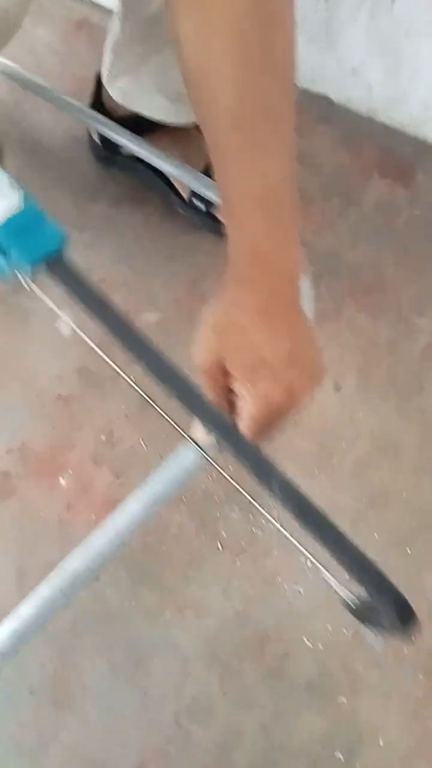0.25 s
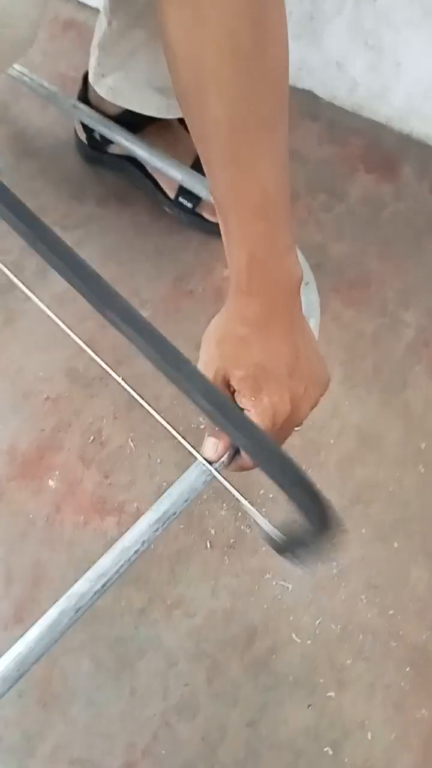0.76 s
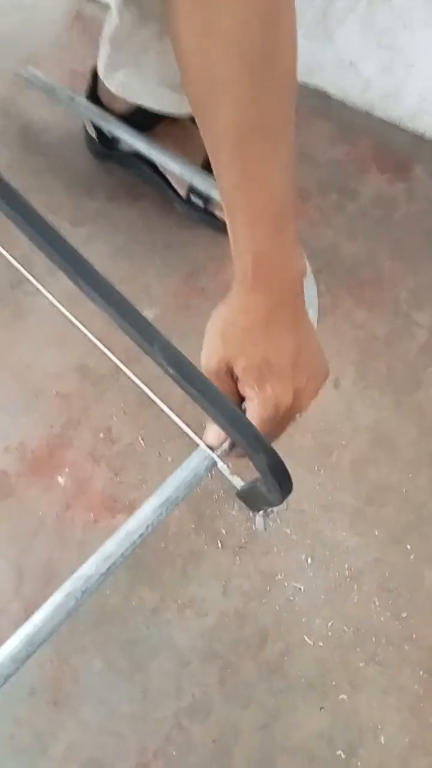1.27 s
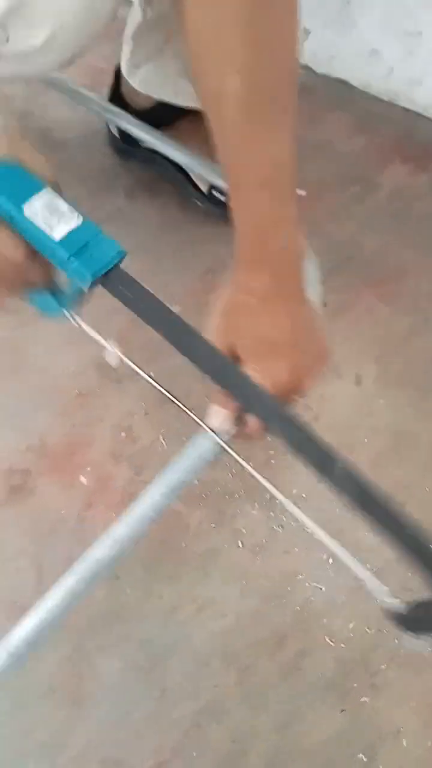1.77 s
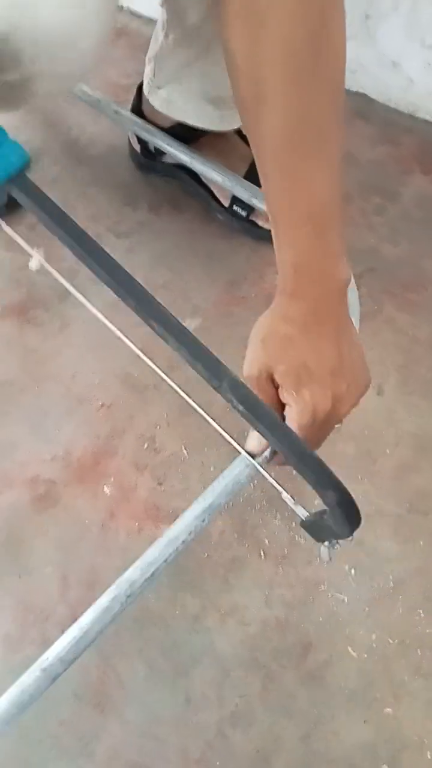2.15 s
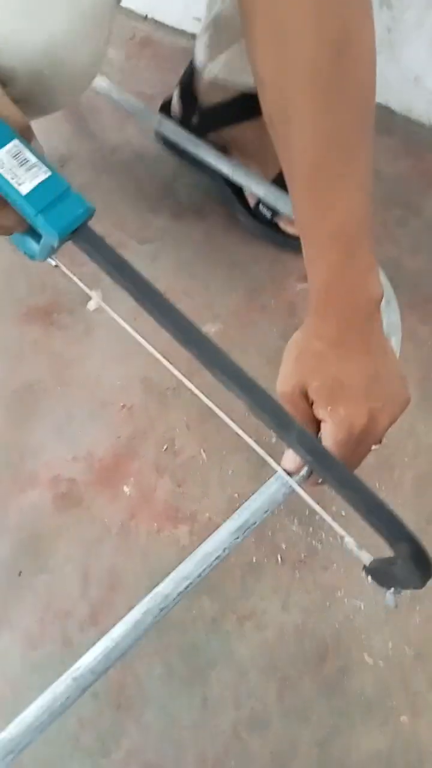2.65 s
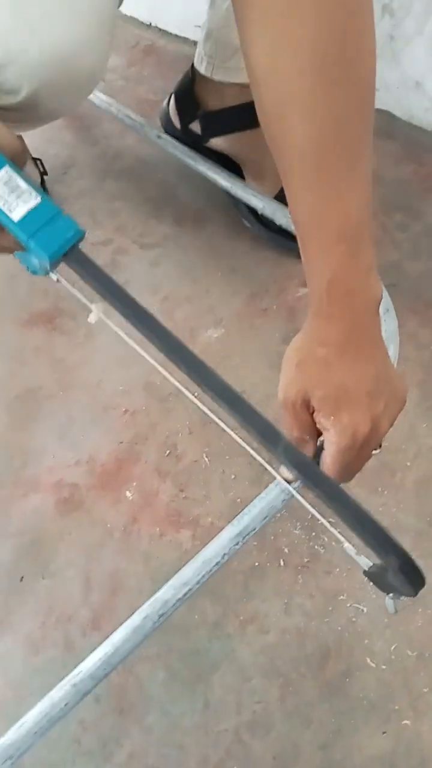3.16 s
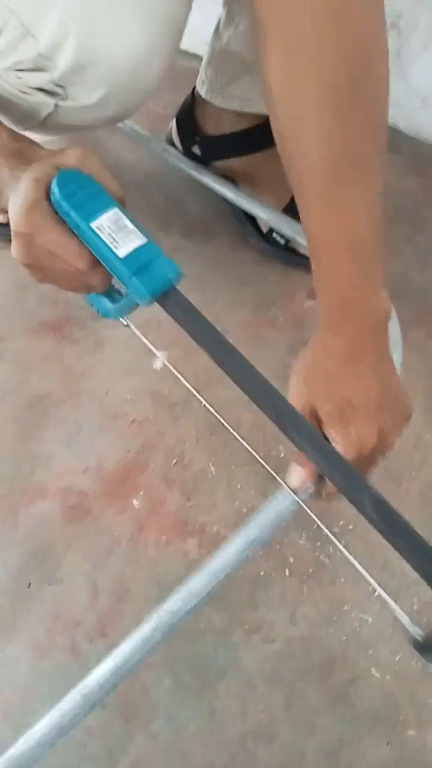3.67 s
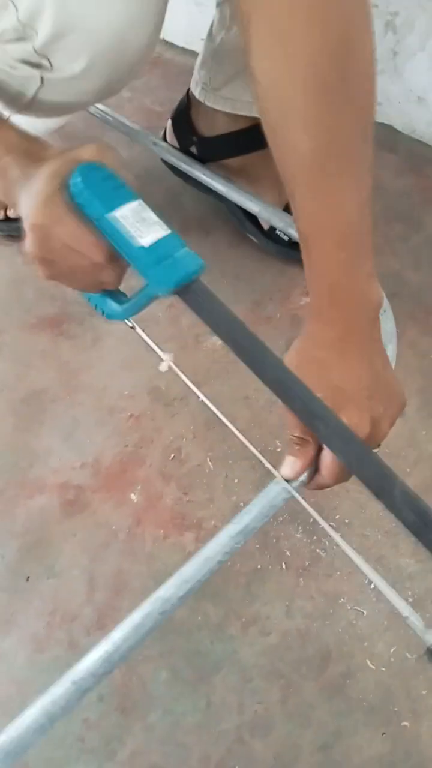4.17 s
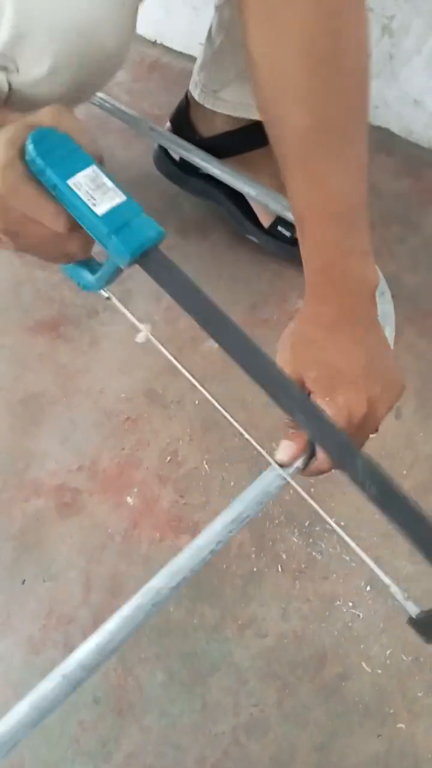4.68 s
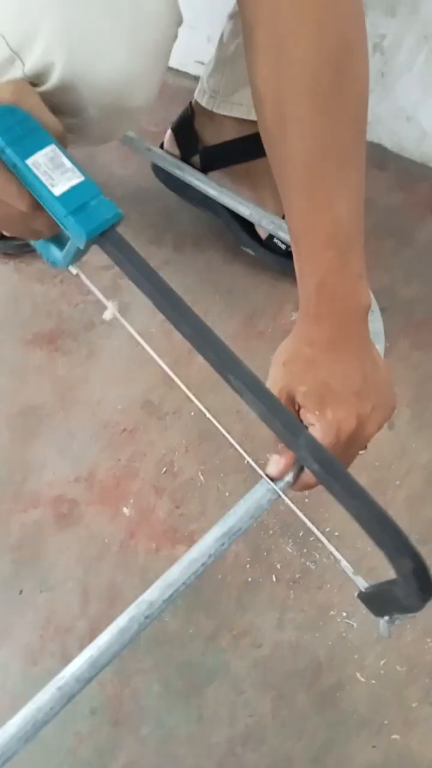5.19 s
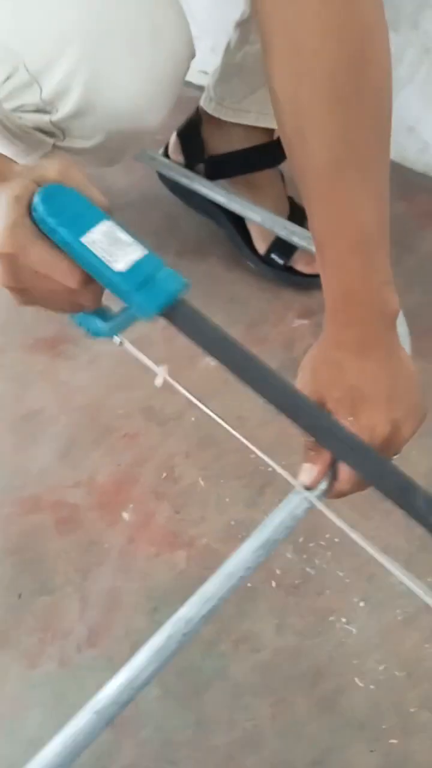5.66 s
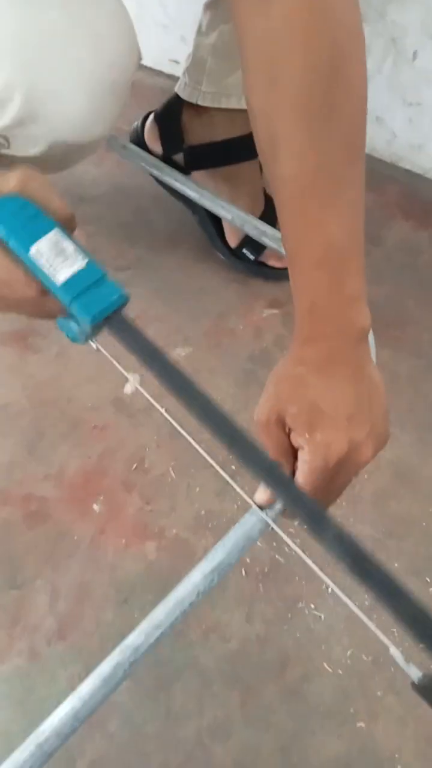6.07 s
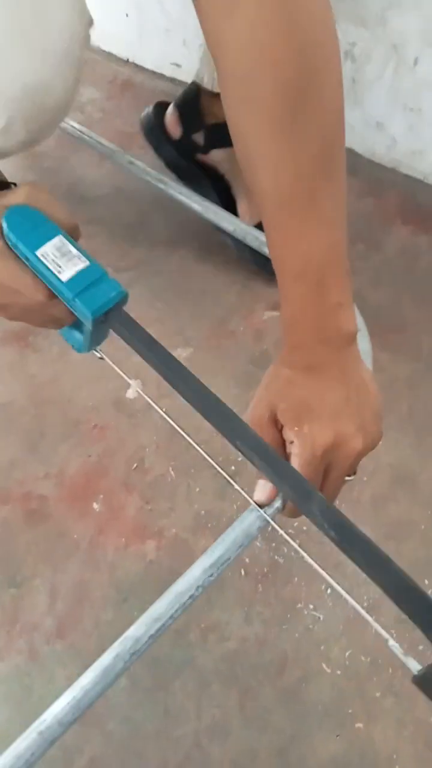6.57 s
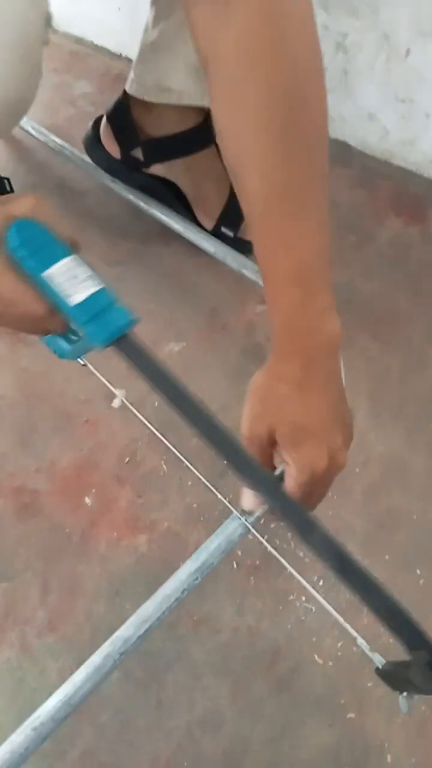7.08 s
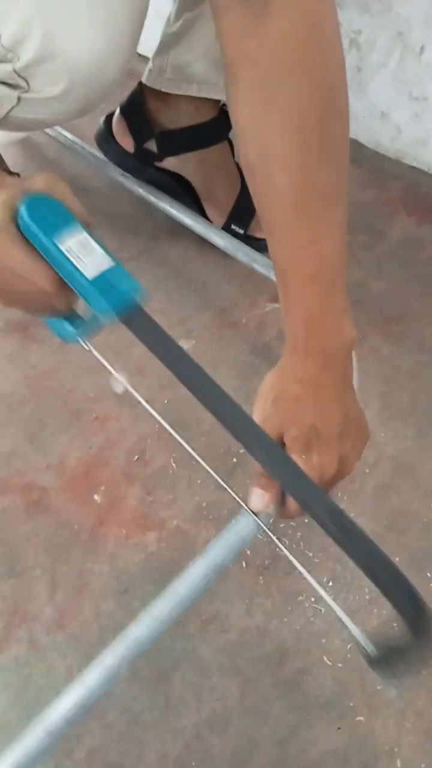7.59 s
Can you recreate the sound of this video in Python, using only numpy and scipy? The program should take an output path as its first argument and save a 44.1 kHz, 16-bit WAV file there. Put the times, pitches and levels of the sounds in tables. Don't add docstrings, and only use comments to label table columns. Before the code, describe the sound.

In a bare, echoing room, a hacksaw cuts a thin steel pipe close to a small, bright phone microphone. After a light scrape and hard clank, uneven rasping strokes come with sharp knocks and faint groans. A loud rattling clank interrupts at three seconds; sawing returns, pauses, then two more clanks precede the last strokes. Distant traffic rumbles throughout.

```python
import sys
import numpy as np
from scipy import signal
from scipy.fft import rfft, irfft
from scipy.io import wavfile
from scipy.ndimage import uniform_filter1d

SR = 44100
rng = np.random.default_rng(int(sys.argv[2]) if len(sys.argv) > 2 else 0)


def materialize(psi):
    bounded = np.clip(np.atleast_2d(psi).T, -1, 1)
    quanta = np.round(bounded * 32767).astype(np.int16)
    wavfile.write(sys.argv[1], SR, quanta)


def field_ratio(decibels):
    return 10 ** (np.asarray(decibels, dtype=float) / 20)


N = 345744

# (frequency [Hz], density [dB per Hz])
TRAFFIC_SPECTRUM = [(21, -63), (33, -36), (42, -9.5), (70, -17), (113, -4.5), (189, 4), (296, -4.5),
                    (362, -0.5), (485, -11.5), (559, -26), (600, -34), (780, -48), (1320, -120)]
# (frequency [Hz], width [Hz], level [dB])
ENGINE_BANDS = [(67.8, 28, 7.5), (172, 23, 3.5), (187, 24, -13)]
# (time [s], level [dB])
TRAFFIC_LEVEL = [(0.0, -50.5), (1.4, -47), (2.0, -50), (4.3, -49), (4.6, -48), (6.3, -47.5), (7.2, -42.5),
                 (7.84, -43)]
# (frequency [Hz], density [dB per Hz])
AIR_SPECTRUM = [(350, -36), (600, -8), (954, 11), (1360, 1), (1580, 10), (2130, 4), (4240, 9.5),
                (7360, -32), (12000, -15), (15600, -67), (22000, -120)]

# (start [s], rise [s], hold [s], cutting level [dB], tooth hiss re cut [dB])
PUSHES = [(0.128, 0.023, 0.042, -11, -17), (0.6, 0.05, 0.035, -8, -21), (0.978, 0.024, .05, -8, -16.5),
          (1.43, 0.028, 0.046, -10, -16), (2.02, 0.032, 0.082, -16.5, -12.5),
          (2.34, 0.027, 0.049, -9.5, -18.5), (3.66, 0.084, 0.028, -10, -19),
          (4.15, 0.042, 0.038, -9, -19.5), (4.655, 0.037, .035, -9.5, -17), (5.6, 0.085, 0.036, -9, -20.5),
          (7.335, 0.027, 0.071, -23.5, -15.5), (7.6, 0.08, 0.016, -11.5, -17.5)]
# (start [s], rise [s], hold [s], cutting level [dB], tooth hiss re cut [dB])
PULLS = [(0.0, 0.0012, 0.073, -33, -21), (0.33, 0.11, 0.0067, -17.5, -17.5),
         (0.74, 0.054, 0.036, -14, -14.5), (1.12, 0.11, 0.041, -14, -20),
         (1.58, 0.049, 0.084, -22.5, -24.5), (1.85, 0.034, 0.023, -30.5, -18),
         (2.2, 0.036, 0.023, -19.5, -20), (2.48, 0.08, 0.05, -21, -15.5), (2.66, 0.023, 0.0073, -43, -24),
         (3.45, 0.043, 0.053, -35.5, -20), (3.84, 0.072, 0.035, -19.5, -17),
         (4.31, 0.094, 0.026, -15.5, -15), (4.9, 0.05, 0.034, -26, -17), (5.28, 0.016, 0.17, -44.5, -15),
         (5.485, 0.023, 0.015, -39, -15), (5.52, 0.068, 0.017, -42.5, -11), (5.76, 0.019, 0.083, -25, -23),
         (7.76, 0.069, 0.021, -18, -17.5)]
# (rise depth [dB], ease time [s], ease depth [dB], drag time [s], drag fade [dB])
PUSH_SHAPE = (32, 0.013, 15.5, .16, 10)
PULL_SHAPE = (17.3, 0.022, 19, 0.21, 11)
THRUM_LIFT = (1, -11.5, -1.5, -14.5, -11)
HISS_LIFT = (-4, 1, -4, -8, -11)
# (frequency [Hz], density [dB per Hz])
SCRAPE_SPECTRUM = [(410, -25), (700, -14.5), (824, 2), (903, -4.5), (1030, -1.5), (1230, -8.5), (1390, 2.5),
                   (1940, -9.5), (3010, 1.5), (4300, 1.5), (6590, -25.5), (8000, -26.5), (10400, -43.5),
                   (17600, -120)]
# (frequency [Hz], density [dB per Hz])
HISS_SPECTRUM = [(3820, -62), (6500, -17), (7310, -35), (8460, 2), (9260, 2.5), (11700, 9.5), (14000, -1.5),
                 (16000, -5)]
# (frequency [Hz], level [dB], decay t60 [s])
PIPE_MODES = [(824, -20, 0.05), (1170, -30.5, 0.45), (1254, -7.5, 0.22), (1656, -11.5, 0.35),
              (1827, -2.5, 0.36), (2040, 3, 0.115), (2190, -13.5, 0.15), (2290, -4.5, 0.43),
              (2560, -1, 0.2), (2750, -13, 0.14), (2928, 1.3, 0.29), (3325, -22, 0.39), (3220, -9, 0.12),
              (3500, -8, 0.58), (3660, -10.5, 0.87), (3806, -6, 0.41), (4063, 2.5, 0.25), (4330, -6, 0.38),
              (5000, -71, 0.028), (4800, -18, 0.067), (5500, -15, 0.029)]
# (frequency [Hz], level [dB], decay t60 [s])
RIM_MODES = [(7650, -1, .3), (7730, 0, .35), (7827, -5, .3), (7962, -6, .25)]
# (frequency [Hz], width [Hz], level [dB])
FRAME_MODES = [(378, 118, -9), (459, 51, -5.5), (675, 43, -5), (824, 43, -4), (937, 92, 2),
               (1140, 35, -12.5)]

# (time [s], peak level [dB], rattle re peak [dB], rim ring re peak [dB], rattle t60 [s])
CLANKS = [
    (0.2196, -0.5, -13.5, -19, 0.37),
    (2.974, 3.5, -14, -13, 0.6),
    (6.3597, 0.5, -14.5, -33, 0.42),
    (6.8646, -0.5, -8.5, -67, 0.27),
]
# (frequency [Hz], width [Hz], level [dB])
CLANK_MODES = [
    [(2850, 40, 7), (2030, 130, -5), (3880, 51, -23), (4800, 32, -18)],
    [(1100, 39, -15), (1720, 13.6, -8.5), (2090, 32, -1), (2770, 160, 6.5), (3077, 16, -4.5), (3356, 31, 3),
     (3760, 29, -18), (3836, 50, 3.5), (4530, 22, -2.5), (4780, 110, -29), (5290, 12, -13)],
    [(1340, 90, -15), (1700, 52, -18), (1900, 15, -10.5), (2170, 29, -4.5), (2560, 52, 1.5),
     (2940, 56, 3.5), (3320, 24, -6), (3500, 22, -28), (3700, 28, -5), (4080, 39, -0.5), (4630, 30, -42)],
    [(372, 42, -15), (1710, 28, -12.5), (2070, 28, -12), (2640, 52, -1), (2910, 27, -5.5), (3790, 22, 1),
     (4200, 13, -15), (4200, 7.7, -8), (4660, 17, -45), (4870, 21, -46)],
]
# (time [s], peak level [dB], low part re peak [dB], top re peak [dB], strongest ring [Hz])
KNOCKS = [(0.4308, -7, -30, -27, 4300), (0.4955, -7.5, -41, -27, 1500), (0.7898, -6, -34, -35, 2970),
          (1.3663, -20.5, 9, -25, 1425), (1.8551, -15, -29, -27, 1720), (1.8738, -9, -39, -41, 1720),
          (2.2049, -9, -31, -38, 1720), (2.2176, -2, -41, -26, 2640), (2.4566, -3.5, -26, -24, 1810),
          (2.6867, -14, -36, -41, 1720), (3.4597, -31, -38, -18, 4370), (3.49, -36, -2, -27.5, 3960),
          (3.693, -23, -3, -15, 4200), (4.0149, 0, -13, -19, 4330), (4.3889, -16, -9, -21, 4370),
          (4.5056, -9.5, -4.5, -20, 4060), (5.254, -11.5, -28, -24.5, 1780), (5.499, -21.5, -5, -32, 2820),
          (5.666, -13.5, -20, -4.5, 4200), (5.8276, -5, -16, -32, 2500), (6.835, -30, -15, -32, 3040),
          (7.682, 4, -12, -26, 3473)]
# (middle [s], half length [s], frequency [Hz], level [dB])
GROANS = [(0.71, 0.085, 269, -31.5), (0.85, .08, 252.2, -34), (1.04, 0.035, 303, -42),
          (1.22, 0.091, 268.8, -32.5), (1.38, 0.21, 246, -25), (1.7, 0.25, 264, -38),
          (2.22, 0.052, 213, -35), (2.68, 0.14, 215, -47), (3.52, 0.051, 850, -37.5),
          (3.84, 0.15, 403.2, -34), (4.82, 0.19, 402.6, -37.5), (5.12, 0.094, 428.4, -44),
          (5.8, 0.11, 420, -37), (7.7, 0.047, 385, -33.5)]
# (frequency [Hz], decay t60 [s])
ROOM_T60 = [(200, 0.73), (530, 0.56), (1390, 0.59), (3680, 0.48), (9700, 0.41)]


def rms_one(x):
    return x / np.sqrt(np.mean(x ** 2) + 1e-20)


def low_pass(x, order, hz):
    return signal.sosfilt(signal.butter(order, hz, fs=SR, output="sos"), x)


def high_pass(x, order, hz):
    return signal.sosfilt(signal.butter(order, hz, "high", fs=SR, output="sos"), x)


def at_hz(points, hz):
    table_hz, values = np.array(points).T
    return np.interp(np.log(hz), np.log(table_hz), values)


def colour(x, spectrum):
    size = 2048
    hz = np.arange(1, size // 2 + 2) * SR / size
    cepstrum = irfft(np.log(field_ratio(at_hz(spectrum, hz))), size)
    cepstrum[1:size // 2] *= 2
    cepstrum[size // 2 + 1:] = 0
    response = irfft(np.exp(rfft(cepstrum)), size)
    response = response / np.sqrt(np.sum(response ** 2))
    return signal.oaconvolve(x, response)[:len(x)]


def drift(rate_hz):
    hop = 441
    knots = rng.standard_normal(N // hop + 300)
    r = np.exp(-2 * np.pi * rate_hz / 100)
    slow = rms_one(signal.lfilter([1], [1, -r], knots)[200:])
    return np.interp(np.arange(N) / hop, np.arange(len(slow)), slow)


def ring(force, hz, t60):
    r = field_ratio(-60 / (t60 * SR))
    w = 2 * np.pi * hz / SR
    return signal.lfilter([0.5, 0, -0.5], [1, -2 * r * np.cos(w), r * r], force + 1e-18)


def background():
    white = rng.standard_normal(N)
    engines = rms_one(sum(field_ratio(db) * rms_one(ring(white, hz, 2.55 / width)) for hz, width, db in ENGINE_BANDS))
    traffic = rms_one(colour(white, TRAFFIC_SPECTRUM)) + field_ratio(-2) * engines
    time_s, level_db = np.transpose(TRAFFIC_LEVEL)
    traffic *= field_ratio(np.interp(np.arange(N) / SR, time_s, level_db) + 0.72 * drift(19))
    return high_pass(traffic, 8, 35) + field_ratio(-51.5) * colour(rng.standard_normal(N), AIR_SPECTRUM)


def contact():
    power = np.zeros((3, N))
    for strokes, shape in ((PUSHES, PUSH_SHAPE), (PULLS, PULL_SHAPE)):
        rise_db, ease_s, ease_db, drag_s, fade_db = shape
        shape_db = -np.array([rise_db, 0, 0, ease_db, ease_db + fade_db])
        for start_s, rise_s, hold_s, db, hiss_db in strokes:
            corners = np.cumsum(np.abs([start_s, rise_s, hold_s, ease_s, drag_s])) * SR
            span = np.arange(int(corners[0]), min(int(corners[-1]), N))
            lifts_db = (0, np.array(THRUM_LIFT), hiss_db + np.array(HISS_LIFT))
            for layer, lift_db in enumerate(lifts_db):
                power[layer, span] += field_ratio(np.interp(span, corners, db + shape_db + lift_db)) ** 2
    return uniform_filter1d(np.sqrt(power), size=200)


def teeth(per_s, spread_db, judder_db):
    force = field_ratio(spread_db * np.minimum(rng.exponential(1, N), 4)) * rng.choice([-1, 1], N)
    catches = force * (rng.random(N) < per_s / SR)
    judder = np.repeat(rng.standard_normal(N // 100 + 1), 100)[:N]
    return rms_one(catches * field_ratio(judder_db * uniform_filter1d(judder, size=180)))


def patchy(x, patch_db):
    low = low_pass(x, 2, 1200)
    most = low_pass(x, 2, 2700)
    return sum(part * field_ratio(patch_db * drift(26)) for part in (low, most - low, x - most))


def muffle(x):
    return low_pass(x, 5, 5100)


def sawing():
    bite = teeth(per_s=4000, spread_db=1.8, judder_db=3.5)
    cut, load, fizz = contact()
    force = bite * cut
    thrum = bite * load
    scrape = field_ratio(-2) * patchy(colour(force, SCRAPE_SPECTRUM), patch_db=1.5)
    pipe = sum(ring(force * field_ratio(db + 11.3 * np.tanh(drift(25))), hz, 0.067 * t60) for hz, db, t60 in PIPE_MODES)
    frame = sum(ring(thrum * field_ratio(db + 8.2 * np.tanh(drift(12))), hz, 0.81 / width)
                for hz, width, db in FRAME_MODES)
    rim = sum(ring(force * field_ratio(db + 3 * drift(2.5)), hz, 0.3 * t60) for hz, db, t60 in RIM_MODES)
    hiss = colour(teeth(per_s=4700, spread_db=-1.5, judder_db=-2) * fizz, HISS_SPECTRUM)
    return scrape + muffle(field_ratio(-31) * pipe + field_ratio(-26.5) * frame) + field_ratio(-60) * rim + field_ratio(2.5) * hiss


def dying_noise(t60, size):
    return rng.standard_normal(size) * field_ratio(-60 * np.arange(size) / SR / t60)


def snap(t60, size):
    spray = 0.45 * dying_noise(t60, size)
    tick = 5.0 * (np.arange(size) == 8)
    return spray + tick


def clanks():
    size = 20000
    out = np.zeros(N + size)
    for (s, peak_db, rattle_db, rim_db, rattle_t60), modes in zip(CLANKS, CLANK_MODES):
        crack = snap(0.072, size)
        rattle = dying_noise(rattle_t60, size)
        force = 1.24 * crack + field_ratio(rattle_db) * rattle
        scrape = high_pass(muffle(colour(force, SCRAPE_SPECTRUM)), 2, 900)
        hiss = colour(crack + field_ratio(-9.5) * rattle, HISS_SPECTRUM)
        rings = muffle(sum(field_ratio(db - 22) * ring(force, hz, 0.65 / width) for hz, width, db in modes))
        rim = sum(field_ratio(db + rim_db - 38) * ring(force, hz, 0.56 * t60) for hz, db, t60 in RIM_MODES)
        sound = field_ratio(-8.5) * scrape + field_ratio(-29 + 0.06 * rim_db) * hiss + rings + rim
        start = int(s * SR)
        out[start:start + size] += field_ratio(peak_db) * sound
    return out[:N]


def knocks():
    out = np.zeros(N + 9000)
    for s, peak_db, low_db, top_db, favoured_hz in KNOCKS:
        crack = np.pad(snap(0.03, size=1000), (0, 6000))
        luck_db = rng.normal(0, 1.6, len(PIPE_MODES))
        body = field_ratio(-27) * ring(crack, favoured_hz, 0.03)
        body += sum(field_ratio(db + extra_db - 29.5) * ring(crack, hz, 0.23 * t60)
                    for (hz, db, t60), extra_db in zip(PIPE_MODES, luck_db))
        body += sum(field_ratio(db + low_db - 24) * ring(crack, hz, 1.74 / width) for hz, width, db in FRAME_MODES)
        rim = sum(field_ratio(db - 62) * ring(crack, hz, t60) for hz, db, t60 in RIM_MODES)
        scrape = field_ratio(-3) * colour(crack, SCRAPE_SPECTRUM)
        hiss = field_ratio(top_db + 5) * colour(crack, HISS_SPECTRUM)
        sound = muffle(body + scrape) + rim + hiss
        start = int(s * SR)
        out[start:start + len(sound)] += field_ratio(peak_db) * sound
    return out[:N]


def groan():
    t = np.arange(N) / SR
    middle_s, _, pitch_hz, _ = np.transpose(GROANS)
    phase = 2 * np.pi * np.cumsum(np.interp(t, middle_s, pitch_hz)) / SR
    swell = sum(field_ratio(db) * np.cos(np.pi / 2 * np.clip((t - s) / half_s, -1, 1)) ** 2
                for s, half_s, _, db in GROANS)
    wobble = low_pass(rng.standard_normal((2, N)), 2, 55)
    return swell * rms_one(wobble[0] * np.cos(phase) + wobble[1] * np.sin(phase))


def room(x):
    t = np.arange(SR) / SR
    edges = 150 * 2 ** np.arange(0, 7.1, 0.5)
    tails = np.zeros((4, SR))
    for low, high in zip(edges, edges[1:]):
        band_filter = signal.butter(2, [low, high], "band", fs=SR, output="sos")
        band = signal.sosfilt(band_filter, rng.standard_normal((4, SR)))
        hz = np.sqrt(low * high)
        tails += band * field_ratio(-60 * t / at_hz(ROOM_T60, hz) - 1.06 * np.log2(hz / 1000))
    tails *= np.clip(t / 0.0013, 0, 1)
    tails /= np.sqrt(np.sum(tails[0] ** 2))
    turn = np.arange(N) / SR / 0.03
    distance = (turn - np.arange(4)[:, None] + 2) % 4 - 2
    share = np.cos(np.pi / 2 * np.clip(distance, -1, 1))
    return signal.oaconvolve(x * share, tails, axes=1)[:, :N].sum(axis=0)


def scene():
    far = background()
    near = sawing() + clanks() + knocks()
    near = high_pass(near, 4, 300)
    return (near + groan() + field_ratio(-7) * room(near) + far)[None]


def top_cut(x):
    return signal.sosfilt(signal.butter(12, 16190, fs=SR, output="sos"), x)


def record(dry):
    level_db = 10 * np.log10(uniform_filter1d(dry[0] ** 2, size=220) + 1e-12)
    fall_db = 45 * np.arange(N) / SR
    held_db = np.maximum.accumulate(level_db + fall_db) - fall_db
    r = np.exp(-1 / (0.00043 * SR))
    duck_db = signal.lfilter([1 - r], [1, -r], 0.17 * np.maximum(held_db + 20.5, 0))
    mix = 1.145 * np.tanh(dry * field_ratio(-duck_db) / 1.37)
    mix = signal.sosfilt(signal.cheby2(12, 60, 16000, fs=SR, output="sos"), mix)
    mix = np.clip(mix, -1, 1)
    return top_cut(mix)


dry = scene()
out = record(dry)
materialize(out)
```